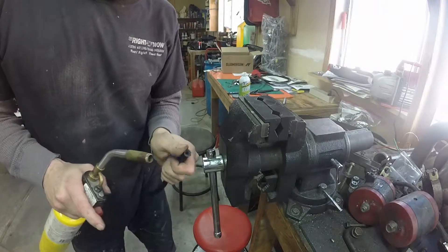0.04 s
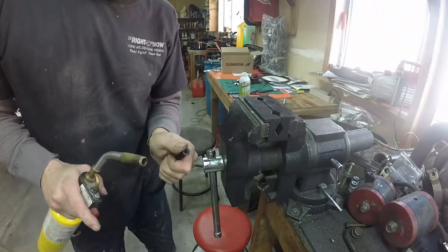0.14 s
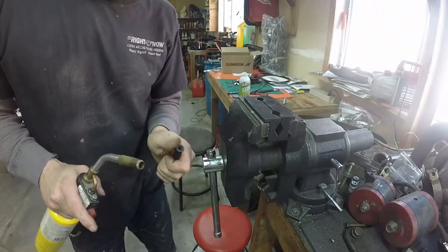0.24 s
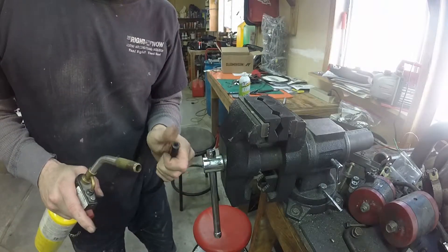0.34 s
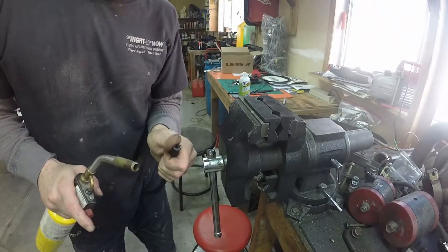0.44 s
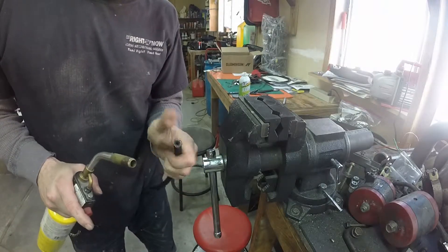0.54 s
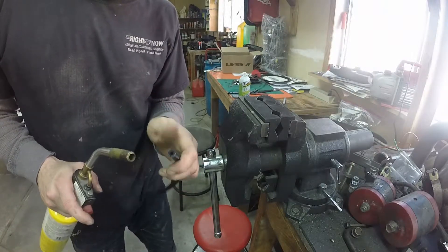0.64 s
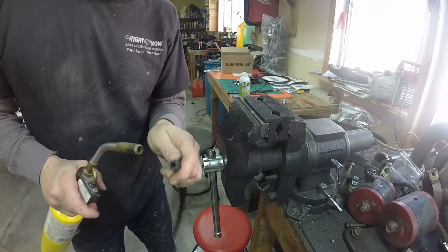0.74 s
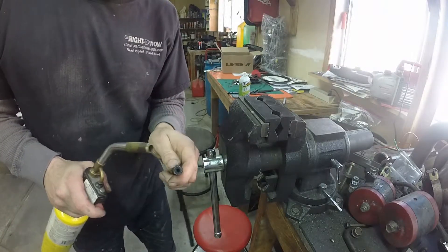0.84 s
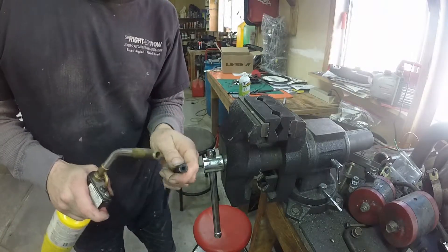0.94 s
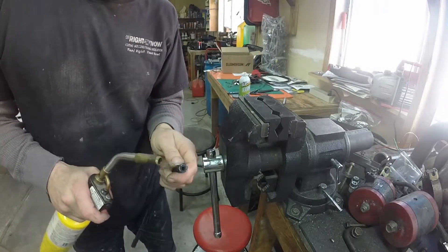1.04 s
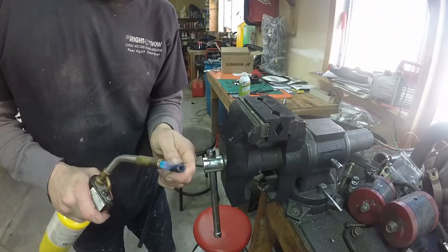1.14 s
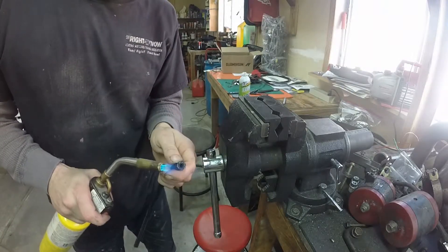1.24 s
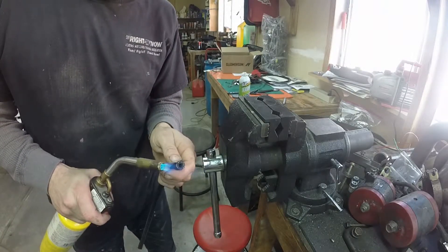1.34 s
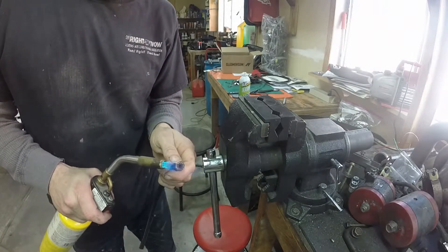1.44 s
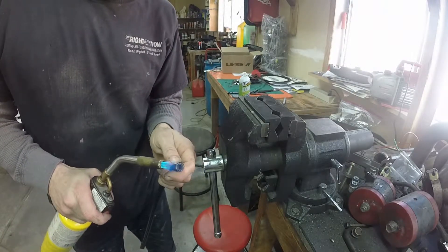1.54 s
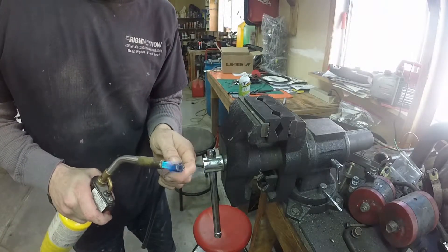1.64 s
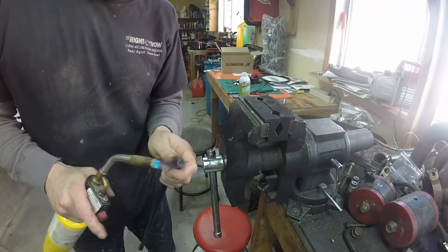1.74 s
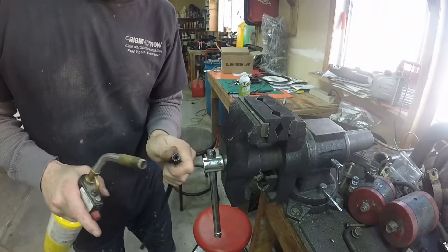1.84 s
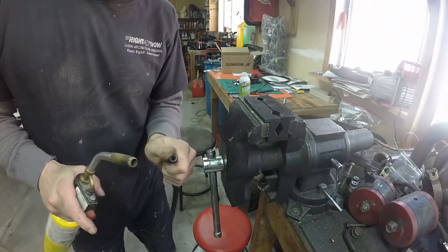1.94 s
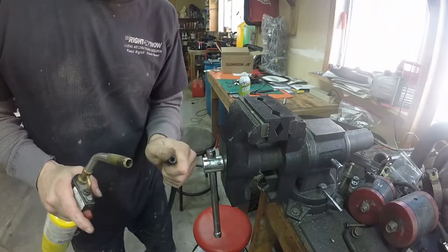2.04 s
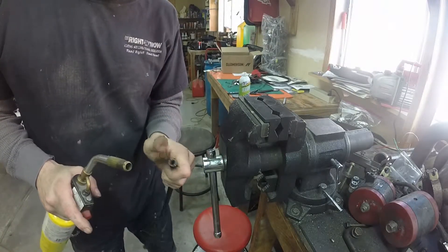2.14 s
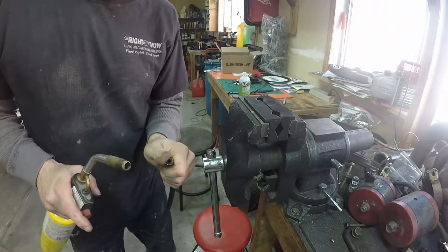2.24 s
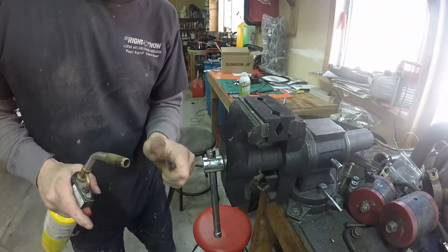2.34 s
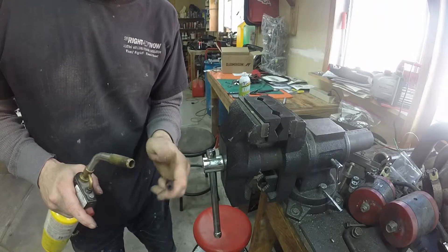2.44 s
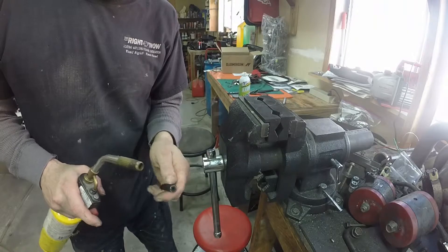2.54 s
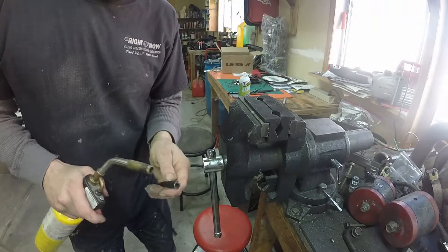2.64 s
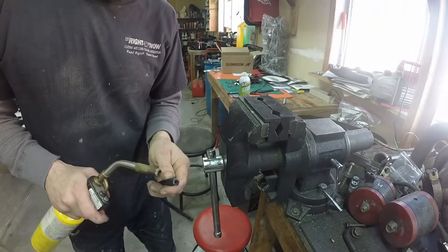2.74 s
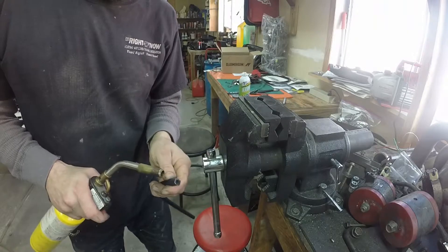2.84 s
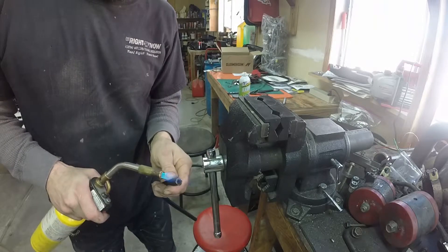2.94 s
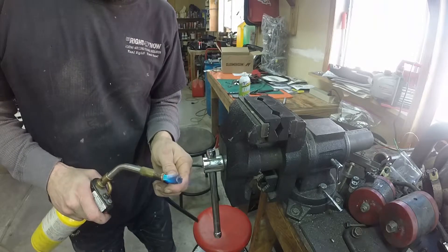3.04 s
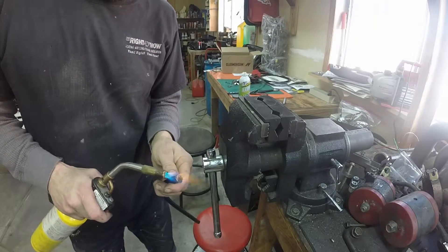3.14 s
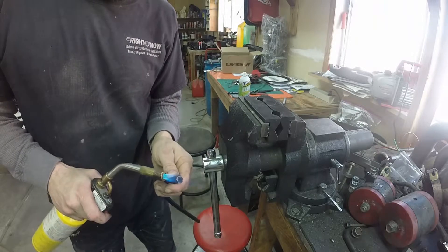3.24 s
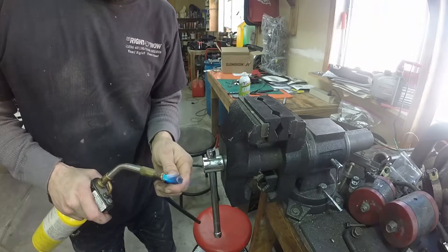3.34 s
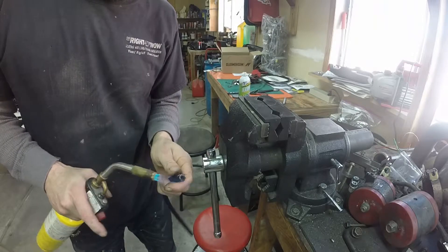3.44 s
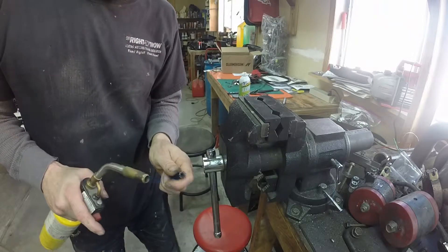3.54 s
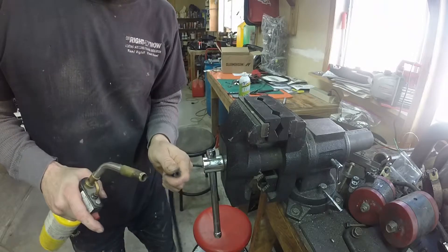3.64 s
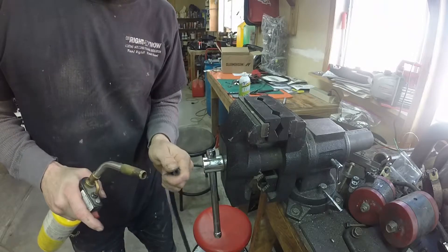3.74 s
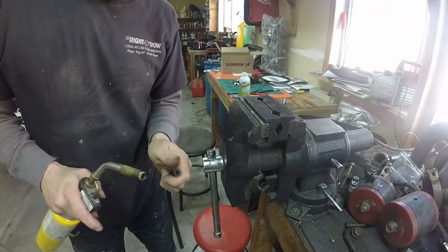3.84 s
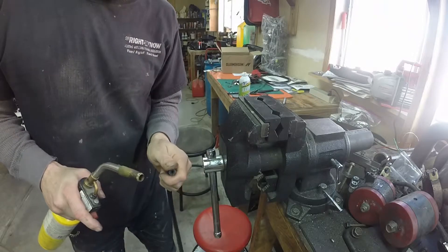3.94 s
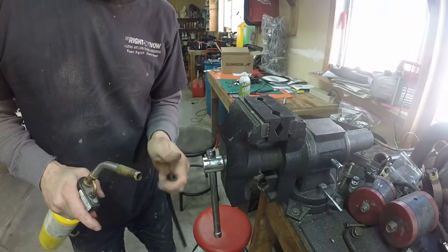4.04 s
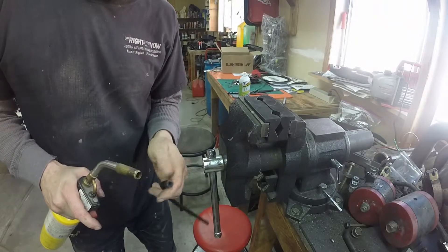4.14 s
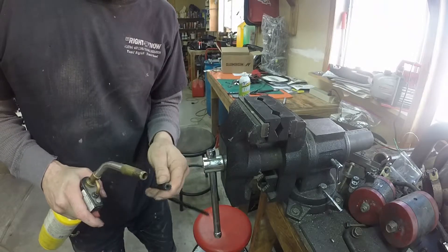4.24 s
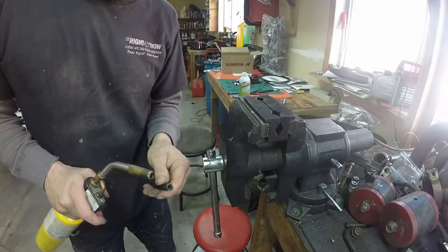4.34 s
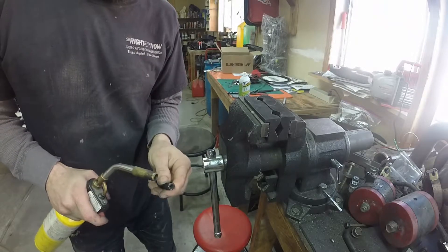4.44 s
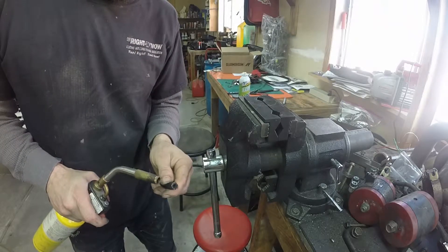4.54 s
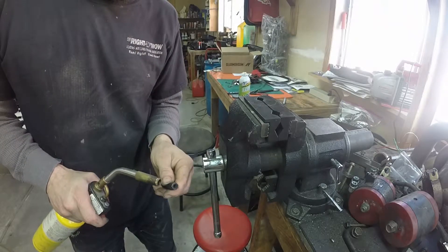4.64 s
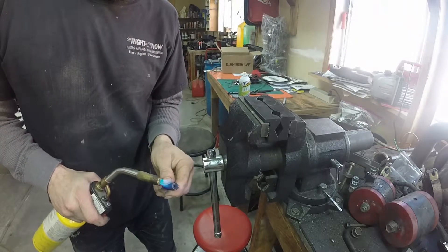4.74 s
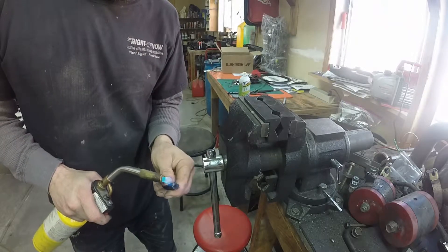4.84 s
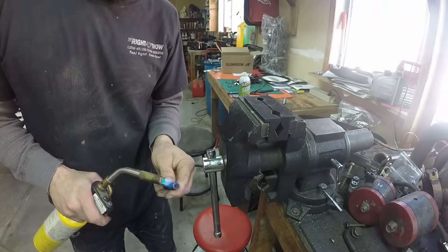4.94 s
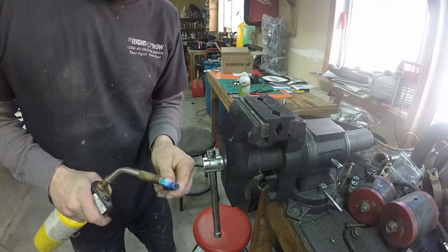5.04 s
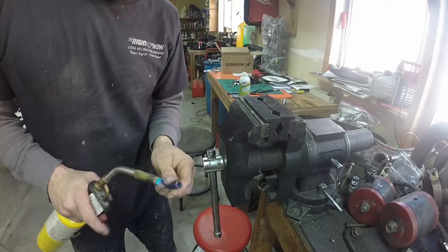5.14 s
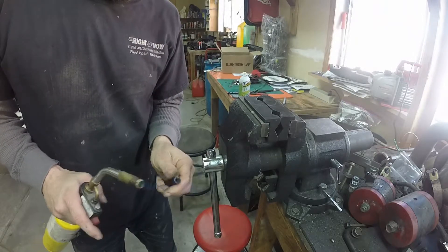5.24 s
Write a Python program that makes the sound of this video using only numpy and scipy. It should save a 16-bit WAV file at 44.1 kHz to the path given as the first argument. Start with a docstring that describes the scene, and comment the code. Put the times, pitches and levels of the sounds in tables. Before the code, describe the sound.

Soft bumps and small handling clicks open in a quiet workshop with a faint hum. Then a gas torch, heard up close, lets out a short hiss, lights with a sharp snap and pop, and burns with a rough roar that quickly dies in a hollow, falling hoot. The same short burst comes twice more, almost evenly spaced, with light clicks from a handled workpiece in the pauses and little echo.

```python
"""A small workshop: a trigger-start gas torch is fired three times, close by.
Each time cold gas hisses through the burner tube, the piezo igniter snaps, the mixture pops and a
turbulent flame roars. On release the gas runs down and the tube hoots with a falling pitch.
Hands bump and a workpiece clicks; room air, a faint hum and a fading low drone lie underneath."""
import sys
import numpy as np
from scipy import signal
from scipy.fft import rfft, irfft
from scipy.io import wavfile
from scipy.ndimage import map_coordinates

SR = 44100
rng = np.random.default_rng(int(sys.argv[2]) if len(sys.argv) > 2 else 0)


def master_out(mix):
    """Clip the mix to full scale and print it as 16-bit PCM to the path in sys.argv[1]."""
    frames = np.transpose(np.atleast_2d(mix))
    ceiling = np.clip(frames, -1, 1)
    pcm = np.round(ceiling * 32767).astype(np.int16)
    wavfile.write(sys.argv[1], SR, pcm)


N = 233486
T = np.arange(N) / SR
FREQS = np.maximum(np.arange(N // 2 + 1) * SR / N, 1)

# Trigger pulls. Each row: valve opening, spark and valve shutting in seconds; snap, igniter ring and
# pop levels in dB; pitch fall of the hoot in Hz, its t60 in seconds.
BURSTS = [(1.026, 1.1962, 1.763, -9, -14.5, -1.5, 152.6, .11),
          (2.853, 2.9796, 3.449, -7.5, -11, 1, 278.3, .025),
          (4.571, 4.747, 5.163, -11.5, -19.5, 0, 155, .08)]
BURN_OFF_S = 0.081  # the flame outlives the shut valve by about this long


def undb(db):
    """Decibels to gain."""
    return 10 ** (np.asarray(db) / 20)


def unit(x):
    """Scale to rms 1."""
    return x / np.sqrt(np.mean(x ** 2))


def slope(points):
    """Gain per frequency from (Hz, dB) points."""
    hz, db = np.transpose(points)
    return undb(np.interp(np.log(FREQS), np.log(hz), db))


def peaks(modes):
    """Power per frequency of steep-sided peaks (Hz, width in Hz, dB)."""
    return sum(undb(db) ** 2 / (1 + ((FREQS - hz) / (.78 * width_hz)) ** 2) ** 2
               for hz, width_hz, db in modes)


def colour(x, gain):
    """Filter x by a gain per frequency; rms 1."""
    return unit(irfft(rfft(x) * gain, N))


def noise(gain):
    """Coloured Gaussian noise; rms 1."""
    return colour(rng.standard_normal(N), gain)


def resonant_noise(modes):
    """Noise through resonances (Hz, width in Hz, dB); rms 1."""
    return noise(np.sqrt(peaks(modes)))


def walk(hz):
    """Random wandering up to about hz; rms 1."""
    return noise(1 / (1 + (FREQS / hz) ** 4))


def wander(x, share):
    """Drift all frequencies of x together by a small share."""
    return map_coordinates(x, [np.cumsum(1 + share * walk(8.02))], order=3, mode="wrap")


def rise(start_s, length_s):
    """Smooth step from 0 to 1."""
    return np.sin(np.pi / 2 * np.clip((T - start_s) / length_s, 0, 1)) ** 2


def fade(start_s, t60_s):
    """1 until start_s, then exponential decay."""
    return np.exp(-np.minimum(np.log(1000) * np.maximum(T - start_s, 0) / t60_s, 60))


def ring(start_s, modes):
    """Damped modes (Hz, dB, t60 in seconds) struck together."""
    live = (T > start_s) & (T < start_s + .5)
    age_s = T[live] - start_s
    out = np.zeros(N)
    for hz, db, t60_s in modes:
        out[live] += undb(db) * np.sin(2 * np.pi * hz * age_s) * np.exp(-np.log(1000) * age_s / t60_s)
    return out


def background(air_db=-48, drone_hz=61.6, drone_db=-44, sag_hz_per_s=4, fade_db_per_s=8, hum_hz=241):
    """Room air, a low drone that sinks and fades, and a faint hum."""
    # Room air spectrum. Each row: frequency in Hz, relative level in dB.
    air_spectrum = [(15, -45.5), (25, 0), (79, -2), (101, -9), (133, -7), (209, -12.5), (246, -10.5),
                    (340, -15), (582, -17), (1020, -21.5), (3340, -27), (4260, -30), (13900, -46),
                    (15500, -49.5)]
    air = undb(air_db + walk(2.5)) * noise(slope(air_spectrum))
    pitch_hz = (drone_hz - sag_hz_per_s * T) * (1 + 0.016 * walk(12.05))
    level_db = drone_db - fade_db_per_s * T + 2 * walk(14)
    drone = undb(level_db) * unit(np.sin(2 * np.pi * np.cumsum(pitch_hz) / SR))
    hum = undb(-64 + 2 * walk(7.6)) * unit(np.sin(2 * np.pi * hum_hz * T))
    return air + drone + hum


def lingering(db=-44, t60_s=0.32):
    """Hoot and hiss of an earlier burst, dying away in the room."""
    bands = resonant_noise([(1026, 140, 2.5), (2950, 1300, -9), (6260, 1100, -17)])
    return undb(db) * rise(0, 0.001) * fade(0, t60_s) * bands


def workshop(x, wet_db=-17, low_t60_s=0.42, high_t60_s=0.26, split_hz=8200):
    """Cluttered room: close echoes, then a short diffuse tail that fades sooner in the treble."""
    # Echoes from body, vise and bench. Each row: delay in seconds, level in dB.
    echoes = [(.00172, -18.5), (.00293, -31), (.00577, -24), (.00682, -17.5), (.00885, -31.5)]
    close = sum(undb(db) * np.interp(T - delay_s, T, x, left=0) for delay_s, db in echoes)
    lowpass = 1 / (1 + (FREQS / split_hz) ** 12)
    tone = slope([(60, -1), (300, 0), (880, -9.5), (1030, -4), (1300, 2), (3200, 1.5), (6500, 8),
                  (9000, 12), (15000, -10)])
    lows = noise(tone * lowpass) * fade(0, low_t60_s)
    highs = noise(tone * (1 - lowpass)) * fade(0, high_t60_s)
    tail = rise(0.0074, 0.0065) * (lows + highs)
    tail = tail[:SR] / np.sqrt(np.sum(tail ** 2) / 2)
    return x + close + undb(wet_db) * signal.fftconvolve(x, tail)[:N]


def knocks(bump_t60_s=0.079, body_t60_s=0.036, contact_t60_s=.022):
    """Hands shift on torch and workpiece: dull bumps, light clicks."""
    # Hand bumps. Each row: start in seconds, level in dB.
    bumps = [(.107, -36.5), (0.135, -42), (0.156, -36), (.222, -44)]
    # Workpiece clicks. Each row: start in seconds, body level in dB, contact level in dB.
    clicks = [(.318, -58, -51), (.594, -47, -56), (.821, -43.5, -62), (2.655, -41.5, -62),
              (3.886, -61, -57), (4.338, -52, -68)]
    # Bump and click resonances. Each row: centre in Hz, width in Hz, relative level in dB.
    bump_modes = [(300, 68, 0)]
    body_modes = [(828, 443, 2.5), (2960, 1900, -5)]
    contact_modes = [(3500, 2000, 3), (10500, 7000, -5)]

    def strike(start_s, db, t60_s):
        return undb(db) * rise(start_s - .001, .0019) * fade(start_s, t60_s)

    bump, body, contact = map(resonant_noise, (bump_modes, body_modes, contact_modes))
    out = sum(bump * strike(start_s, db, bump_t60_s) for start_s, db in bumps)
    for start_s, body_db, contact_db in clicks:
        out += body * strike(start_s, body_db, body_t60_s)
        out += contact * strike(start_s, contact_db, contact_t60_s)
    return out


def cold_gas(db=-37, swell_db=2, drift=0.0054):
    """Unlit gas excites the tube until the spark; the pitch wavers as gas displaces air."""
    # Cold tube resonances. Each row: centre in Hz, width in Hz, relative level in dB.
    tube_modes = [(958, 76, -4), (2183, 95, -4), (2500, 300, -20), (3410, 110, 1.5), (4670, 90, -8.5),
                  (5590, 280, -6), (6060, 240, -12), (6450, 90, -9), (6950, 150, -17), (7600, 150, -18.5),
                  (8800, 160, -22), (12700, 177, -27)]
    # Gas jet spectrum. Each row: frequency in Hz, relative level in dB.
    jet_spectrum = [(200, -18.5), (700, -20), (1500, -29.5), (3000, -14.5), (4200, -23.5), (6000, -15),
                    (8300, -37), (9400, -32), (10300, -19), (11600, -21), (13000, -23), (13700, -33.5),
                    (15500, -41)]
    hiss = wander(noise(np.sqrt(peaks(tube_modes) + slope(jet_spectrum) ** 2)), drift)
    flow = np.zeros(N)
    for open_s, spark_s, *_ in BURSTS:
        progress = np.clip((T - open_s) / (spark_s - open_s), 0, 1)
        flow += rise(open_s - .003, 0.019) * fade(spark_s, .02) * undb(swell_db * (progress - 1))
    return undb(db) * flow * hiss


def hoots(centre_hz=1036, db=-23.5, waver=0.0039, rough_db=3):
    """The dying flame sings in the tube; the pitch falls as the gas cools."""
    wobble = 1 + waver * walk(118)
    roughness = undb(rough_db * walk(90))
    out = np.zeros(N)
    for _, _, shut_s, *_, fall_hz, t60_s in BURSTS:
        die_s = shut_s + BURN_OFF_S
        hz = np.interp(T, [shut_s, die_s], [centre_hz + fall_hz / 2, centre_hz - fall_hz / 2]) * wobble
        swell = rise(shut_s + 0.0028, 0.031) * fade(die_s - .008, t60_s)
        out += swell * np.sin(2 * np.pi * np.cumsum(hz) / SR)
    return undb(db) * roughness * out


def igniter(ring_t60_s=0.077, tick_db=-50):
    """The hammer hits the piezo crystal and the housing rings; the valve ticks on shutting."""
    # Hammer crack spectrum. Each row: frequency in Hz, relative level in dB.
    snap_spectrum = [(200, 4.5), (1000, 2), (2200, 1), (3500, 13), (4800, -4.5), (6300, 1.5), (8500, -11),
                     (11000, -12.5), (13000, -5.5), (16000, -23)]
    # Housing resonances. Each row: centre in Hz, width in Hz, relative level in dB.
    housing_modes = [(10250, 350, -4.5), (10960, 270, 1), (11250, 360, -2.5)]
    snap = noise(slope(snap_spectrum))
    housing = resonant_noise(housing_modes)
    tick = resonant_noise([(14500, 2000, 0)])
    out = np.zeros(N)
    for _, spark_s, shut_s, snap_db, ring_db, *_ in BURSTS:
        out += undb(snap_db) * snap * rise(spark_s - .0006, 0.0007) * fade(spark_s + 0.00074, 0.036)
        decay = undb(2.5) * fade(spark_s + 0.00094, 0.0077) + undb(-13) * fade(spark_s, ring_t60_s)
        out += undb(ring_db) * housing * rise(spark_s, 0.00047) * decay
        out += undb(tick_db) * tick * rise(shut_s - .003, .001) * fade(shut_s, .014)
    return out


def pops(delay_s=0.00322, width_s=0.00078, highpass_hz=65):
    """The flame front leaves the tube: one pressure swing, a short boom, a rough bark."""
    # Ignition boom modes. Each row: frequency in Hz, relative level in dB, t60 in seconds.
    boom_modes = [(134, -7.5, 0.038), (194, -9, 0.03), (293, -6.5, 0.028), (86, -5, 0.032)]
    rasp = resonant_noise([(477, 286, 0)])
    out = np.zeros(N)
    for _, spark_s, _, _, _, pop_db, *_ in BURSTS:
        widths = (T - spark_s - delay_s) / width_s
        swing = undb(7) * widths * np.exp(-widths ** 2 / 2)
        boom = undb(-2) * ring(spark_s + delay_s, boom_modes)
        bark = undb(-11) * rasp * rise(spark_s + 0.00048, 0.0007) * fade(spark_s + 0.0044, 0.023)
        out += undb(pop_db) * (swing + boom + bark)
    # the pops carry little deep bass
    return signal.sosfilt(signal.butter(1, highpass_hz, "high", fs=SR, output="sos"), out)


def flame(db=-13.5, eddy_db=1.5, flutter_db=0.5, drift=.006, catch_s=0.049, run_down_t60_s=0.3):
    """Eddies burn in quick uneven puffs; after shut-off a small flame burns off the rest."""
    # Steady peaks that colour the roar. Each row: centre in Hz, width in Hz, relative level in dB.
    roar_peaks = [(216, 28, -1.5), (291.5, 41, -1.5), (625, 21, -4.5), (732, 93, 0.5), (828, 106, 1.5),
                  (971.6, 63, 0.5), (1108, 46, -1), (1227, 37, -4), (1780, 47, -14.5), (1882, 70, -11.5),
                  (2337, 49, -15.5), (2410, 32, -19), (2670, 57, -27), (2724, 120, -10), (2950, 144, -9),
                  (3260, 220, -13.5), (3770, 110, -20), (5820, 110, -27), (6630, 348, -28.5),
                  (12600, 640, -43)]
    # Turbulent flame spectrum. Each row: frequency in Hz, relative level in dB.
    flame_spectrum = [(40, -39), (85, -17.5), (160, -7.5), (400, -3.5), (1050, -23), (1400, -13),
                      (2300, -16), (3500, -12), (4300, -29.5), (5100, -31), (7400, -29), (8300, -44.5),
                      (9300, -44), (10200, -34.5), (12500, -46), (15500, -53.5)]
    puffs = rng.standard_normal(N) * undb(eddy_db * walk(510))
    roar = colour(puffs, np.sqrt(peaks(roar_peaks) + slope(flame_spectrum) ** 2))
    roar *= undb(db + flutter_db * walk(38))
    roar = wander(roar, drift)  # the peaks drift slightly in pitch
    hiss = resonant_noise([(2060, 360, 15), (2880, 1200, 11.5), (5860, 1460, 1), (10500, 900, -17)])
    small_flame = undb(-10.5) * roar + undb(-32) * hiss
    out = np.zeros(N)
    for _, spark_s, shut_s, *_ in BURSTS:
        lit = rise(spark_s, .003) * rise(spark_s - .009, catch_s)
        closed = rise(shut_s - .004, 0.025)
        run_down = fade(shut_s + 0.043, run_down_t60_s) * fade(shut_s + BURN_OFF_S - .012, 0.11)
        out += lit * (1 - closed) * roar + closed * run_down * small_flame
    return out


def scene():
    """The torch in its room; mono."""
    torch = cold_gas() + igniter() + pops() + flame() + hoots() + knocks()
    return (workshop(torch) + lingering() + background())[None]


def record(dry):
    """The pops clip at full scale; a steep low-pass cuts the top."""
    top_hz = 15500
    return signal.sosfilt(signal.ellip(8, .2, 70, top_hz, fs=SR, output="sos"), np.clip(dry, -1, 1))


dry = scene()
out = record(dry)
master_out(out)
```